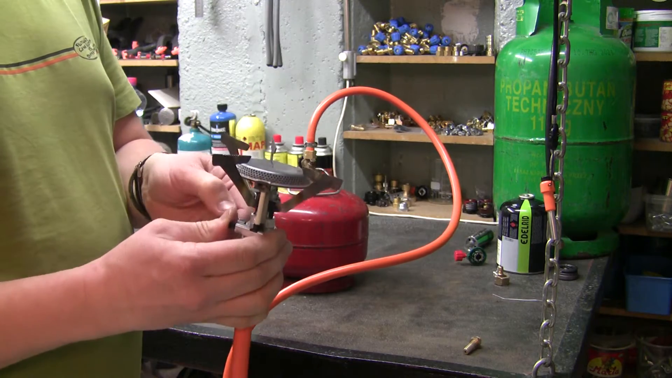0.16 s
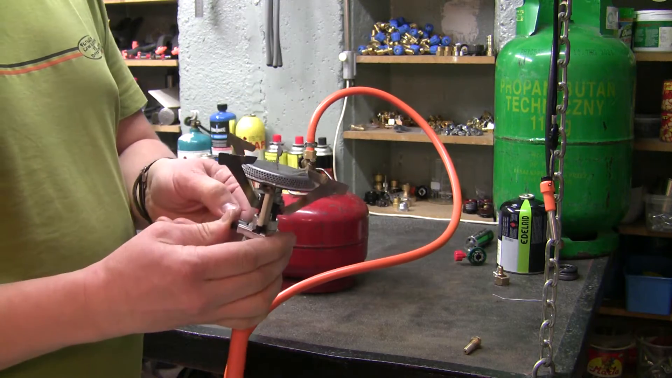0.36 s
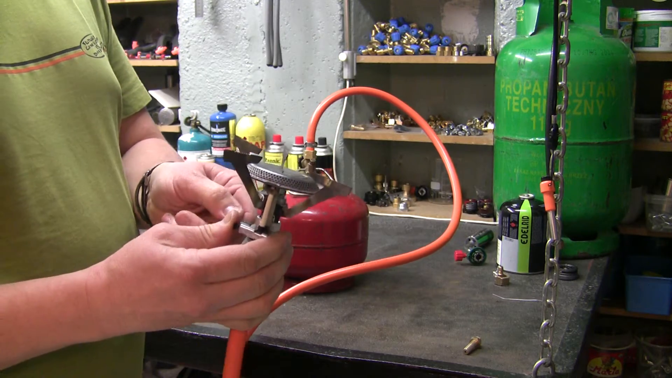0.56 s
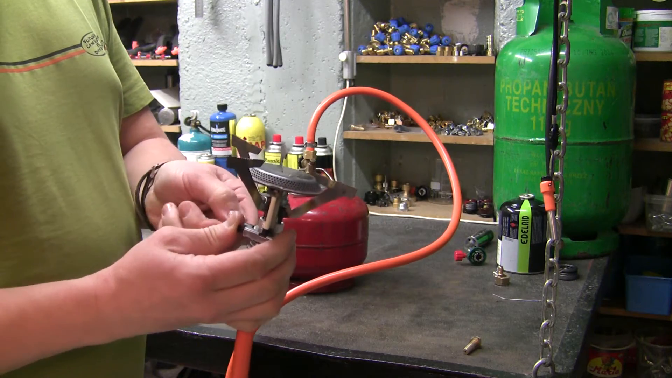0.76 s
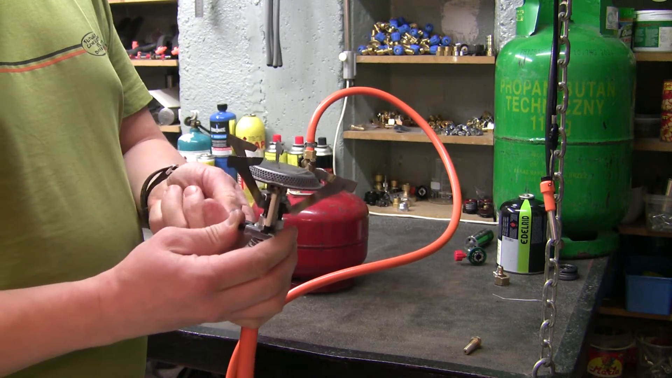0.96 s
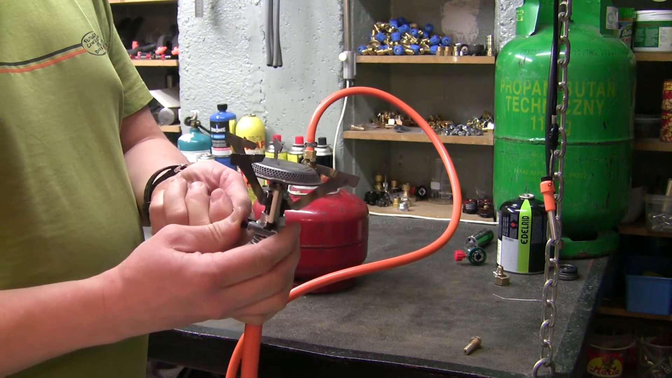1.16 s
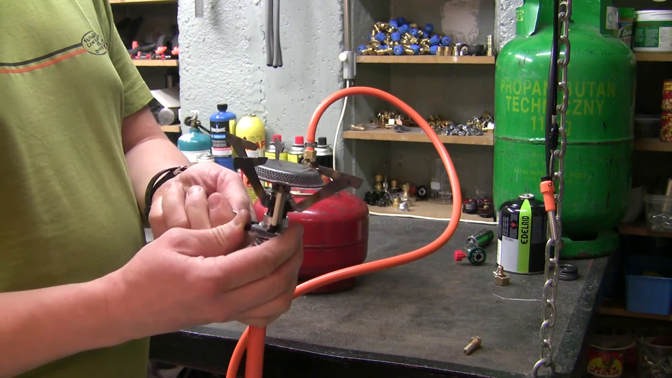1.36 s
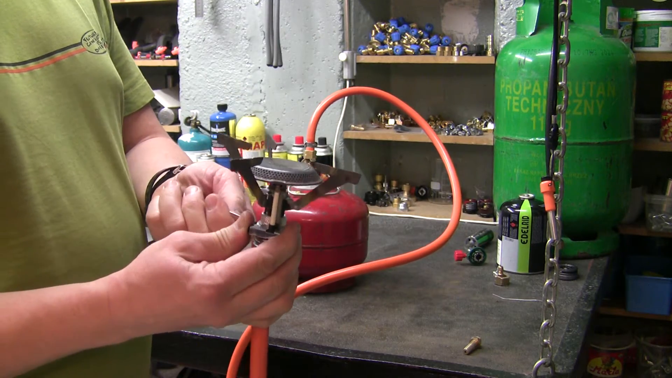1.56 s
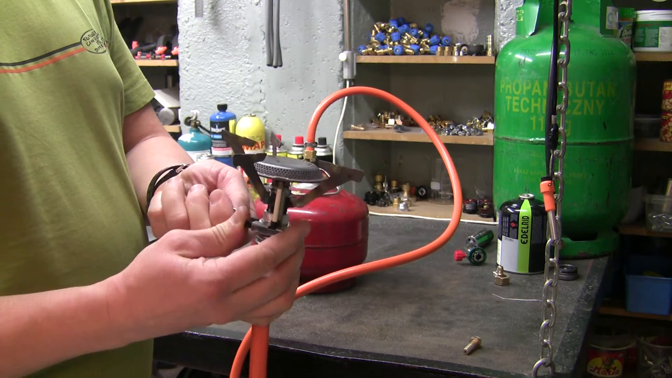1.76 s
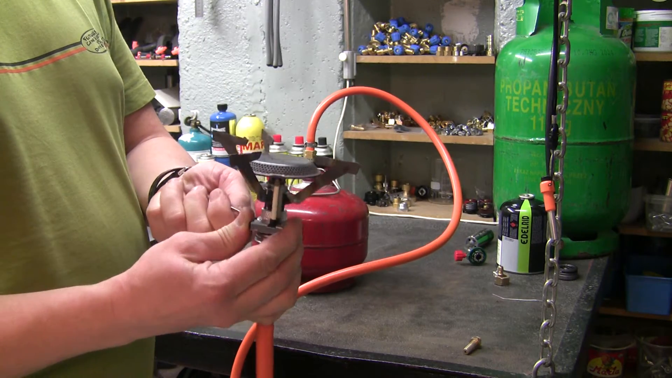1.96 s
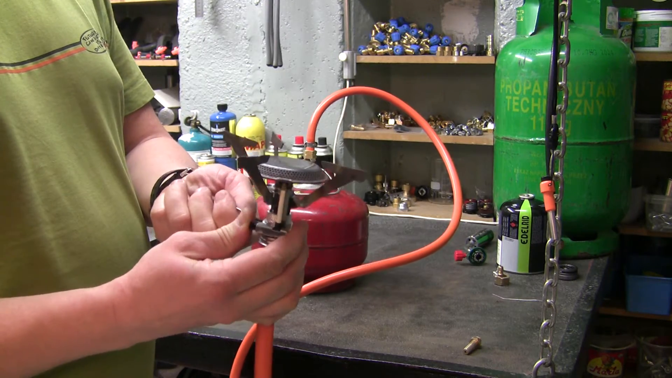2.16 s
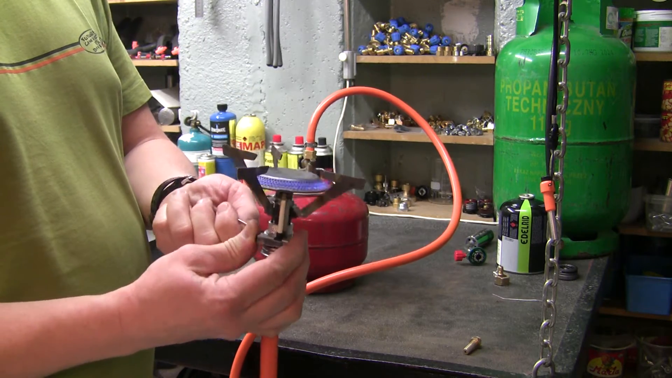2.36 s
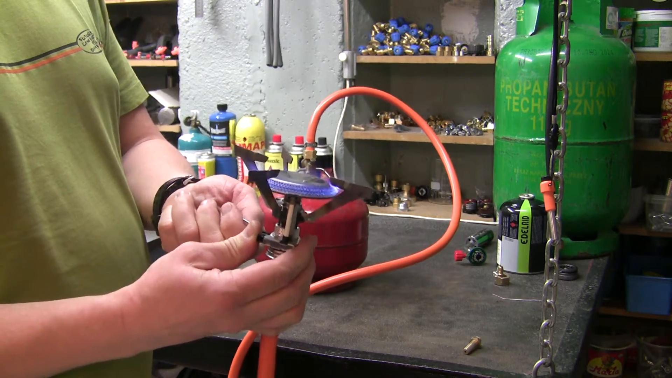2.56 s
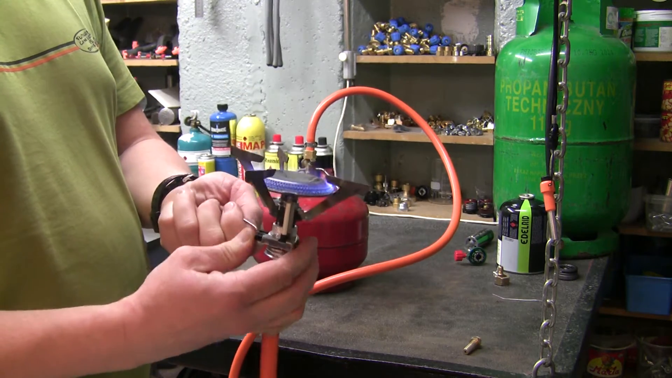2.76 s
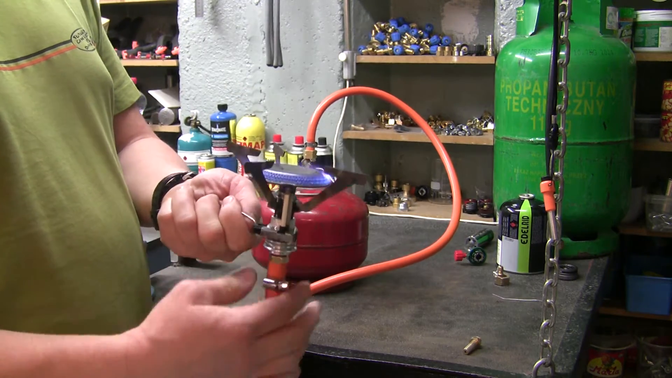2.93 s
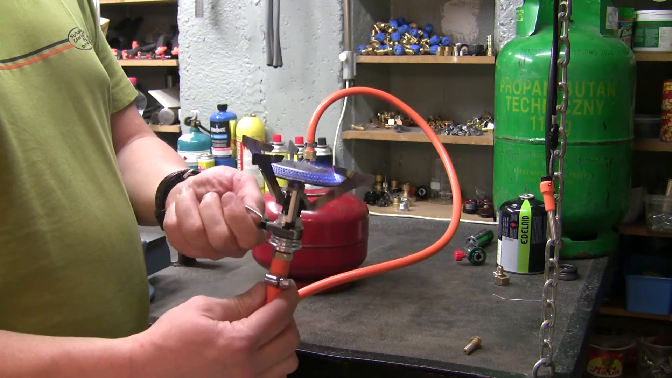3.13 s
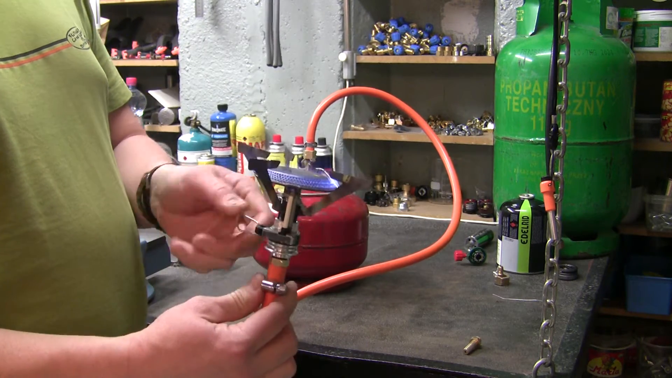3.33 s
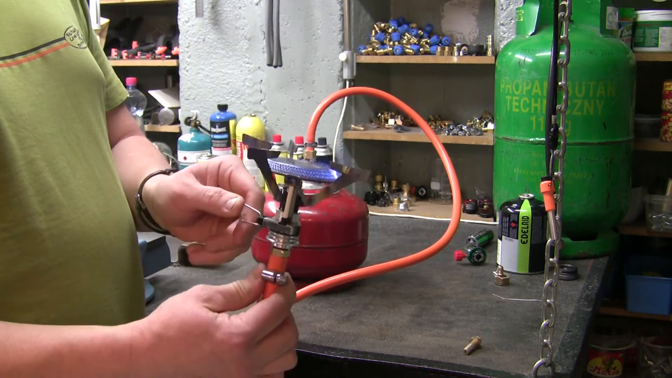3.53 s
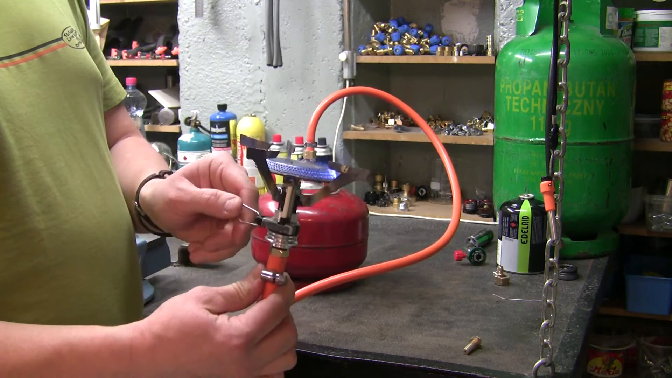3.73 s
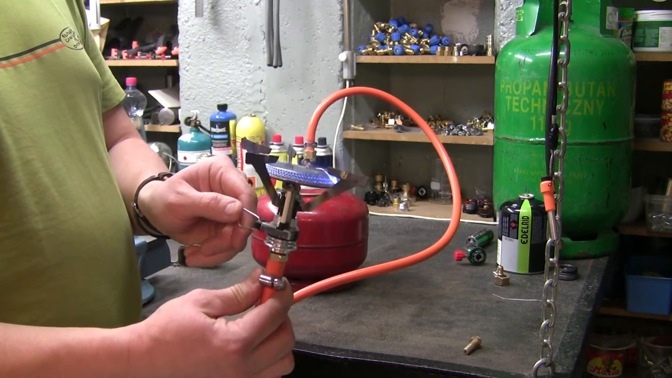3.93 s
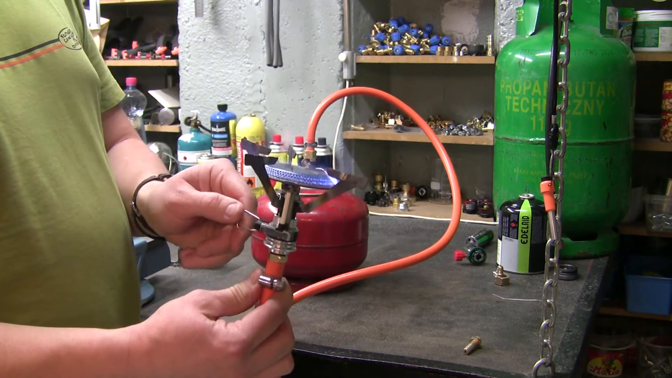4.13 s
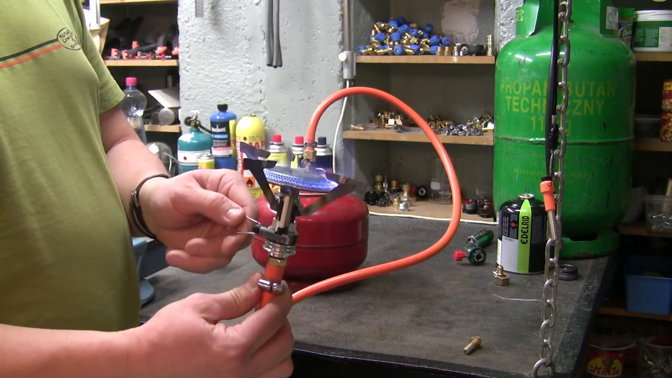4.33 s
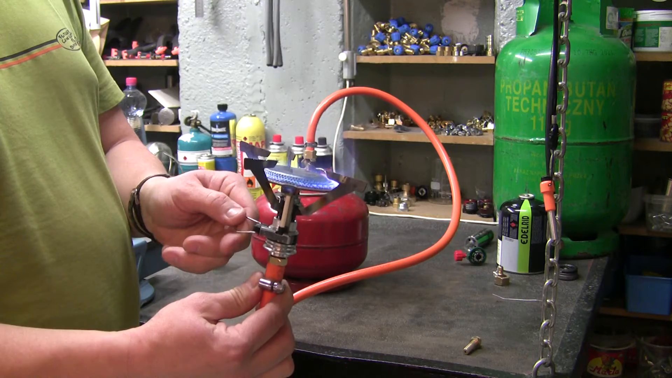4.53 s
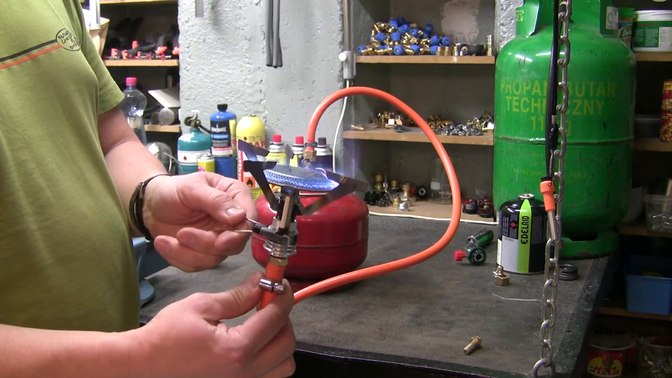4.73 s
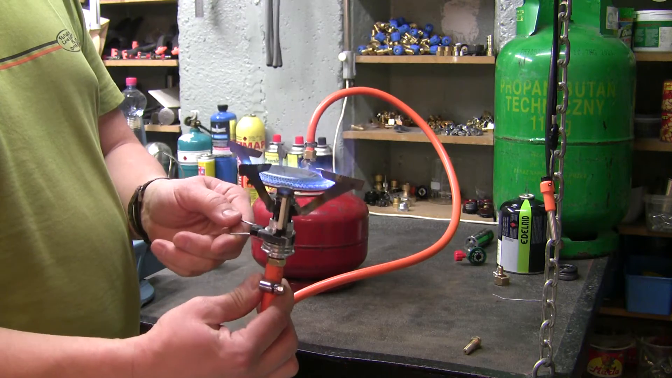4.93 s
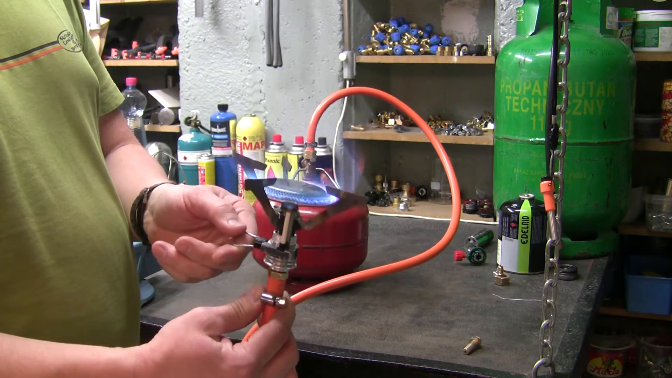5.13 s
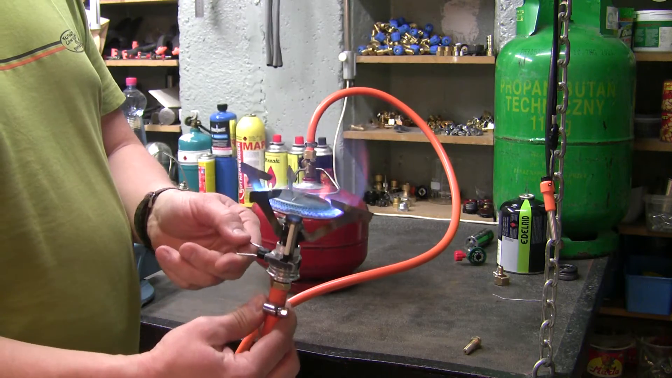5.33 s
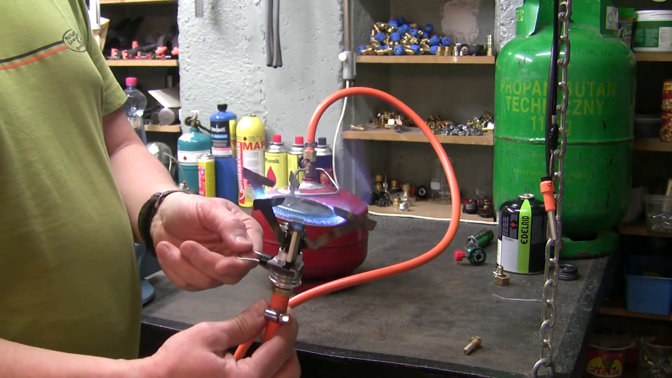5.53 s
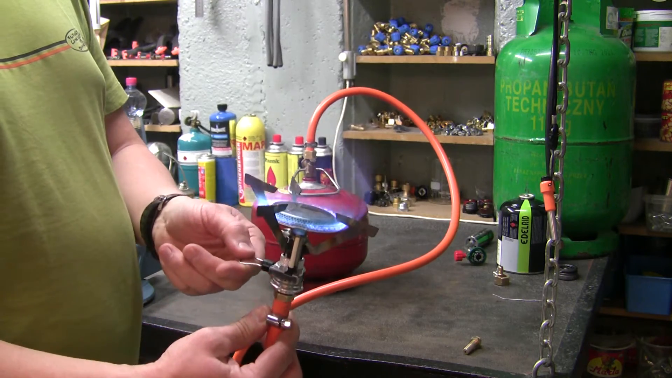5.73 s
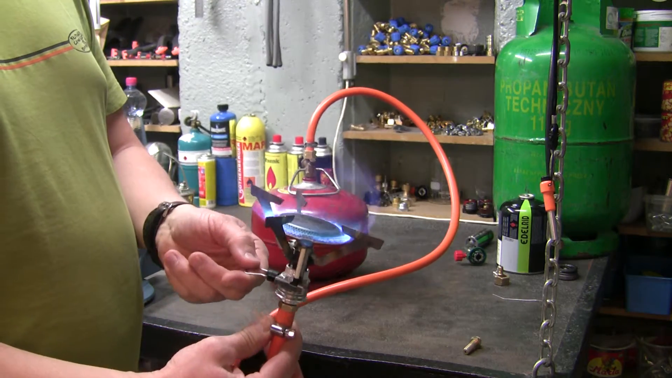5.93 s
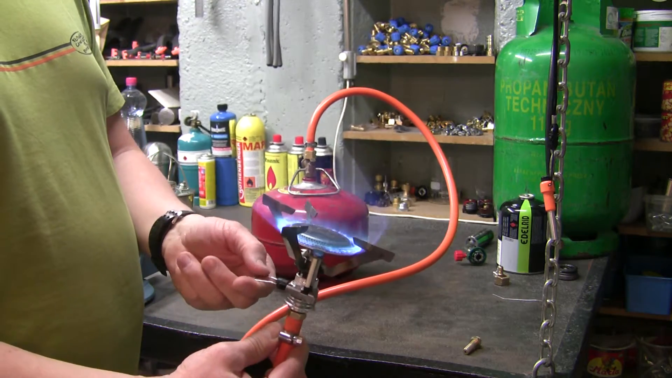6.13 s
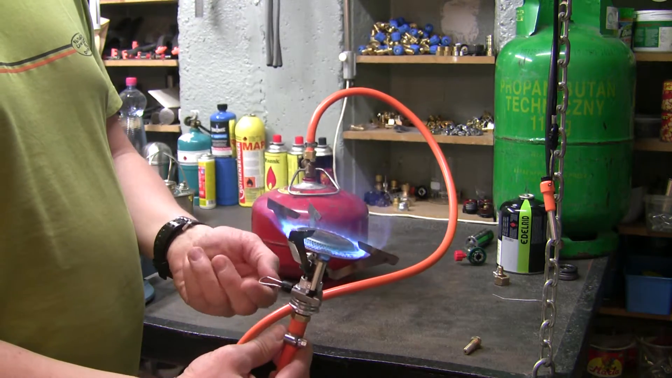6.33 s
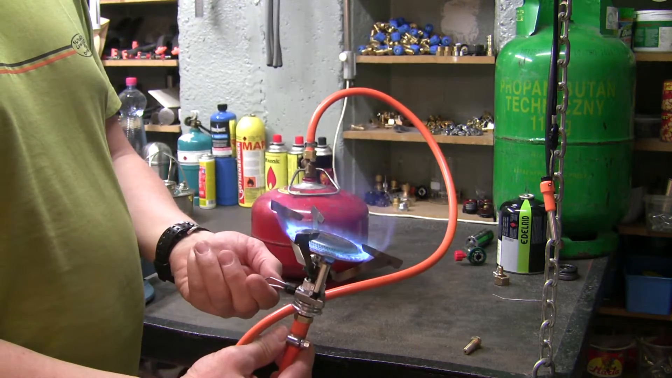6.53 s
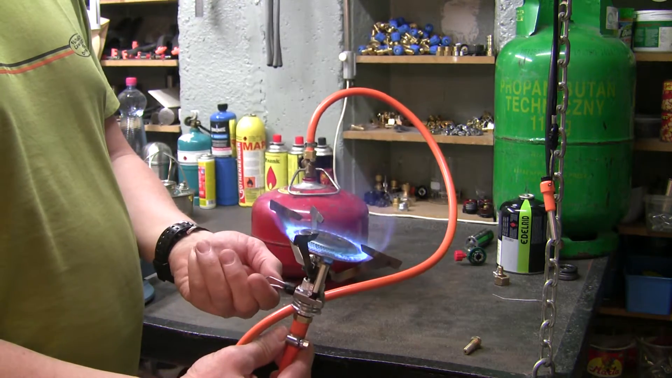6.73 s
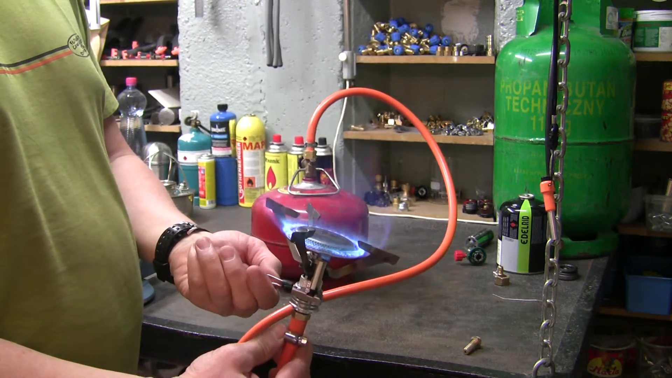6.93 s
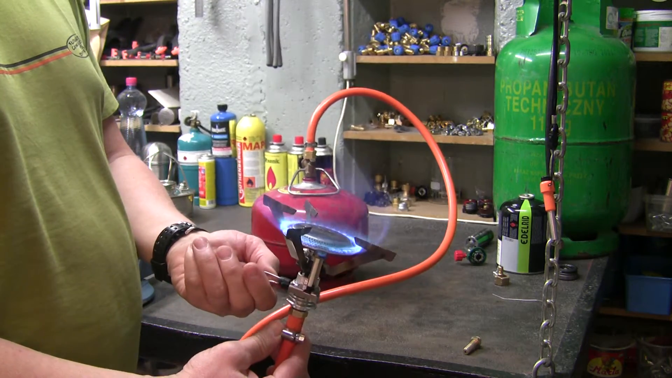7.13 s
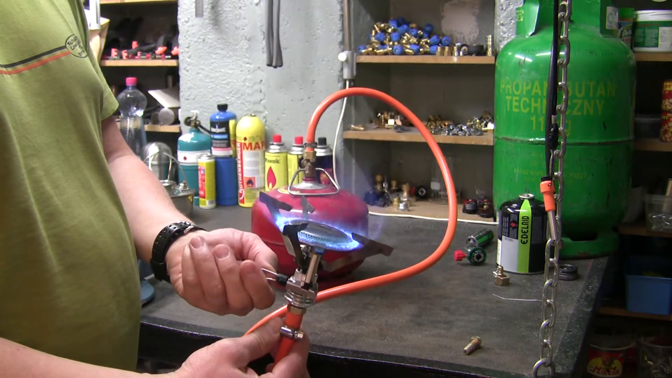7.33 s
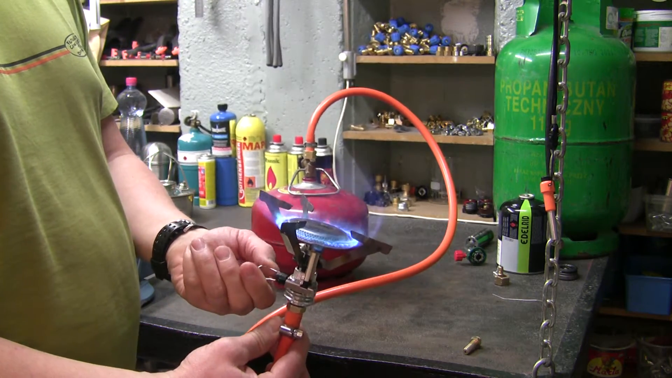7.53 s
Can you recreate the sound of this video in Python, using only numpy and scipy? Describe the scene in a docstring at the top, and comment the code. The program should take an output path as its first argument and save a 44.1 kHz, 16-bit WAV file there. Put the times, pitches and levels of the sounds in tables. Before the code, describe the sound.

Close mono perspective in a small workshop with a short reverberation. At first there is only quiet air and a faint low hum, with small metal ticks of the stove fittings around 0.6-0.7 s. From about 0.95 s a very faint gas hiss begins and strengthens in steps, thin and breathy, with a slight whistle near 3 kHz. Sharp, bright igniter snaps crack at 1.5, 1.9 and 2.3 s, far louder than the hiss, with little handle ticks between and just after them. The third lights the gas: a soft, deep swell rather than a bang, then a low, fluttering rumble. It burns calmly until about 3.85 s, when the hiss rises. From 4.1 s the valve opens wide and jet and flame swell to a roar, full by about 6 s. Brief low flares puff near 4.9, 5.3 and 7 s; the steady, bright, rushing roar continues to the end, around 7.6 s.

```python
"""Lighting a camping stove

A hand-held camping stove is lit in a small workshop, close to a mono microphone.
Gas hisses through the resonant burner tube; the piezo igniter snaps three times and the third spark lights it.
The flame, fluttering bands of noise, rumbles low; the valve opens wide and jet and flame swell to a roar.
Struck metal rings in dying modes, and quiet air and a faint hum lie behind."""
import sys
import numpy as np
from scipy import signal
from scipy.fft import rfft, irfft
from scipy.io import wavfile
from scipy.ndimage import uniform_filter1d, minimum_filter1d

SR = 44100
rng = np.random.default_rng(int(sys.argv[2]) if len(sys.argv) > 2 else 0)


def output_pcm(signal):
    """Save a mono or channel-first signal as 16-bit PCM at the path in sys.argv[1].

    Samples are clipped to [-1, 1] before scaling.
    """
    pcm = np.clip(np.atleast_2d(signal).T, -1, 1) * 32767
    wavfile.write(sys.argv[1], SR, np.round(pcm).astype(np.int16))


N = 334542
TIME = np.arange(N) / SR
LIT_S = 2.30
FULL_FLOW_DB = -24  # reference hiss level for a wide-open valve

# turns of the gas valve: start_s, length_s, level_db (hiss reached, before the tube warms)
VALVE_TURNS = [(0.933, 0.16, -76), (1.0, .16, -58), (1.146, .1, -49), (1.74, 0.99, -41.5),
               (3.84, 0.42, -36.5), (4.104, 2, -22.5)]
HOT_HISS_DB = -2.5  # the warm burner tube softens the hiss


def flow():
    """Throttling: each valve turn moves the jet's strength (dB) to a new level, quickly and then easing off."""
    level = np.full(N, 1e-5)
    for start, length, db in VALVE_TURNS:
        left = 1 - np.clip((TIME - start) / length, 0, 1)
        level = level + (gain_of(db) - level) * (1 - left ** 2)
    return 20 * np.log10(level) + HOT_HISS_DB * warmth()


# broadband spectrum of the gas jet: frequency_hz, density_db (relative, per Hz)
JET_SPECTRUM = [(60, -28), (300, -1.5), (900, -4), (1600, -1), (2500, -0.5), (4000, 0), (5900, -2.5),
                (8500, -2), (10700, -6), (12000, -13.5), (12700, -17.5), (14700, -14.5), (15250, -16),
                (15800, -23)]
# burner tube resonances: cold_hz, hot_hz, width_hz, cold_lift_db, hot_lift_db
TUBE_RESONANCES = [(4330, 4503, 540, 7.5, 6.5), (5100, 4930, 740, 9.5, 4.5), (6840, 6930, 660, 6, 5.5),
                   (7460, 7506, 465, 6.5, 9), (9000, 9680, 490, 4.5, 4), (11490, 11560, 660, 10, 7),
                   (13900, 13650, 810, 13, 11)]
# echoes of the hiss from hand, bench and gas bottles: delay_s, tilt_shift_s, level_db
HISS_ECHOES = [(.0011, .00005, -35), (.0026, -.00014, -16), (.0047, 0.0043, -13), (.0079, -.0002, -5.5),
               (0.0133, .0003, -24), (0.02, .0002, -20)]
# shares by which the tube's resonances shift as the stove moves
TILT_DETUNE, SWAY_DETUNE = 0.007, 0.0049


def jet(flow_db):
    """Turbulent jet noise excites the burner tube, whose resonances shift and change strength as it heats."""
    hz, when, z = signal.stft(noise(JET_SPECTRUM), SR, nperseg=1024, noverlap=768)
    hz, heat = hz[:, None], np.interp(when, TIME, warmth())
    tilt = tilt_at(when)
    sway = np.interp(when, TIME, waver(rate_hz=1.56))  # the hand is never quite still

    for cold, hot, width, cold_db, hot_db in TUBE_RESONANCES:
        centre = (cold + (hot - cold) * heat) * (1 + TILT_DETUNE * tilt + SWAY_DETUNE * sway)
        lift_db = cold_db + (hot_db - cold_db) * heat
        z = z * gain_of(lift_db * bump(hz, centre, width))

    # each echo combs the hiss, and the combs slide as the stove moves
    moved = tilt + .25 * sway
    comb = 1
    for delay, shift, db in HISS_ECHOES:
        comb = comb + gain_of(db) * np.exp(-2j * np.pi * hz * (delay + shift * moved))
    z = z * comb

    hiss = workshop(from_spectrogram(z), wet_db=-10.5)
    hiss /= band_rms(hiss, (5500, 15000))
    mixed = hiss * gain_of(flow_db) + whistle(z, hz, when, heat, flow_db)
    return mixed * (TIME > VALVE_TURNS[0][0]) * gain_of(0.34 * waver(rate_hz=24))


# breathy whistle of the tube: cold_hz, hot_hz, width_hz (before flow broadens it)
TUBE_WHISTLE = (3238, 3305, 185)
WHISTLE_DB, WHISTLE_PER_FLOW = -17, 0.59  # offset, and dB gained per dB of hiss
WHISTLE_HOT_DB, WHISTLE_BLUR = -5.5, 0.81


def whistle(z, hz, when, heat, flow_db):
    """Resonance filtering: a narrow peak selects a breathy tone from the jet noise, and strong flow widens it."""
    cold, hot, width = TUBE_WHISTLE
    relative_flow = np.interp(when, TIME, gain_of(flow_db - FULL_FLOW_DB))
    width = width * (1 + WHISTLE_BLUR * relative_flow ** 2)
    tuned = 1 / (1 + (2 * (hz - cold - (hot - cold) * heat) / width) ** 2)
    tone = evened(from_spectrogram(z * tuned))
    # the whistle grows more slowly than the hiss, and the flame damps it
    level_db = WHISTLE_DB + WHISTLE_PER_FLOW * flow_db + WHISTLE_HOT_DB * warmth()
    return tone * gain_of(level_db)


# the stove is raised, then lowered and tilted toward the microphone:
# time_s, tilt (share: 0 upright, 1 toward it, below 0 away)
STOVE_TILT = [(2.8, -0.19), (4.2, -0.52), (5.0, -0.026), (5.6, 0.16), (6.3, 0.62), (7.57, 0.83)]


def tilt_at(seconds):
    """Source orientation: the stove's tilt, interpolated between its stated positions."""
    return np.interp(seconds, *np.transpose(STOVE_TILT))


WARM_S = .17  # time constant


def warmth():
    """Exponential heating: the burner tube goes from 0 cold to 1 hot."""
    return 1 - np.exp(-since_lit() / WARM_S)


def since_lit():
    """Combustion time: seconds for which the flame has burned."""
    return np.maximum(TIME - LIT_S, 0)


# the flame flares as the stove is swung: centre_s, length_s (at half height), lift_db (of the rumble)
SWING_FLARES = [(4.896, 0.17, 2.0), (5.31, 0.075, 1.5), (6.987, 0.064, 4)]
CATCH_S, SETTLE_S = 0.061, 1  # time constants: catching, and settling as it spreads round the head
FLUTTER_DB, FLUTTER_HZ, DRAUGHT_DB, DRAUGHT_HZ = 0.94, 65, -0.11, 4.9


def flame(flow_db):
    """Combustion noise: unsteady burning modulates a low rumble and a roar, both weak just after lighting."""
    weak = np.exp(-since_lit() / SETTLE_S)
    unrest_db = FLUTTER_DB * waver(FLUTTER_HZ) + DRAUGHT_DB * waver(DRAUGHT_HZ)
    flare_db = sum(db * bump(TIME, s, length) for s, length, db in SWING_FLARES)
    burning = rumble(weak, unrest_db + flare_db)
    burning += roar(flow_db, weak, unrest_db + 0.31 * flare_db)
    return (burning + whump()) * (1 - np.exp(-since_lit() / CATCH_S))


# spectrum of the flame's rumble: frequency_hz, density_db (relative, per Hz)
RUMBLE_SPECTRUM = [(20, -48), (45, -33), (70, -21), (95, -12.5), (120, -0.5), (170, 1), (260, 0.5),
                   (340, -4), (480, -11.5), (700, -19), (1300, -30.5), (3000, -79)]
RUMBLE_DB, RUMBLE_WEAK_DB, RUMBLE_TILT_DB = -23.5, -9, -1.6


def rumble(weak, unrest_db):
    """Low-frequency combustion noise: its level follows the flame's unrest and falls slightly with tilt."""
    sound = noise(RUMBLE_SPECTRUM)
    sound /= band_rms(sound, (90, 350))
    return sound * gain_of(RUMBLE_DB + RUMBLE_WEAK_DB * weak + RUMBLE_TILT_DB * tilt_at(TIME) + unrest_db)


# spectrum of the flame's roar: frequency_hz, density_db (relative, per Hz)
ROAR_SPECTRUM = [(100, -37), (250, 3), (400, 7), (560, 2), (780, -2.5), (950, 2.5), (1200, -2), (1450, -9),
                 (2200, -11.5), (5000, -50)]
ROAR_DB, ROAR_WEAK_DB, ROAR_PER_FLOW = -28, -3, 0.49  # the last is dB per dB of hiss
# below a certain flow the flame is calm and its roar much quieter
TURBULENT_FLOW_DB, TURBULENT_SPREAD_DB, CALM_DB = -39, 2.4, -8.5
# the part of the roar that grows as the flame faces the microphone
FORWARD_SHARE, FORWARD_HZ, FORWARD_WIDTH_HZ = 0.52, 470, 260


def roar(flow_db, weak, unrest_db):
    """Transition to turbulence: the roar strengthens with flow, and more steeply where the calm flame ends."""
    sound = noise(ROAR_SPECTRUM)
    sound /= band_rms(sound, (700, 1300))
    hz = np.fft.rfftfreq(N, 1 / SR)
    low_middle = irfft(rfft(sound) * bump(hz, FORWARD_HZ, FORWARD_WIDTH_HZ), N)
    sound += FORWARD_SHARE * tilt_at(TIME) * low_middle
    calm = 1 / (1 + np.exp((flow_db - TURBULENT_FLOW_DB) / TURBULENT_SPREAD_DB))
    level_db = ROAR_DB + ROAR_WEAK_DB * weak + ROAR_PER_FLOW * (flow_db - FULL_FLOW_DB)
    return sound * gain_of(level_db + CALM_DB * calm + unrest_db)


WHUMP_DB, WHUMP_HZ, WHUMP_LAG_S, WHUMP_S = -41.5, 95, 0.24, .6


def whump():
    """Rapid combustion: gas gathered around the head burns off in a soft, deep swell of narrow-band noise."""
    hz = np.fft.rfftfreq(N, 1 / SR)
    sound = evened(irfft(rfft(rng.standard_normal(N)) * bump(hz, WHUMP_HZ, width=42), N))
    return sound * gain_of(WHUMP_DB) * bump(TIME, LIT_S + WHUMP_LAG_S, WHUMP_S)


# igniter snaps: start_s, level_db (relative), thump_db (in the hand)
IGNITER_SNAPS = [(1.5422, 0, -48), (1.9412, -1, -57), (2.2965, -1, -58)]
# spectrum of the crack: frequency_hz, density_db (relative)
CRACK_SPECTRUM = [(100, -31), (700, -23), (1700, -9.5), (2600, 2), (3300, 0), (5400, 5.5), (6200, 6.5),
                  (7800, 5.5), (9300, 2), (11500, 6.5), (13300, 0.5), (14400, 2), (15300, 6), (16000, -18)]
# modes of igniter and burner head, struck: pitch_hz, level_db (relative), t60_s
HEAD_MODES = [(3120, -23, 0.036), (5300, -28, 0.011), (7900, 5.5, 0.004), (8800, -20, 0.0063),
              (15000, -29, 0.011)]


def igniter():
    """Impact excitation: a sprung hammer hits the crystal; it cracks, the head rings and the hand feels a thump."""
    out, t = np.zeros(N), np.arange(3000) / SR
    thump = np.sin(2 * np.pi * 140 * t) * bump(t, .014, .022)
    chatter = np.exp(-t / 0.0021) + .08 * np.exp(-t / 0.0041)
    for s, db, thump_db in IGNITER_SNAPS:
        crack = signal.fftconvolve(burst(chatter), causal(CRACK_SPECTRUM))
        add(out, s, gain_of(db + 8.5) * crack)
        add(out, s, gain_of(db - 7) * ring(HEAD_MODES, detune=0.011))
        add(out, s, gain_of(thump_db) * thump)
    return out


# ticks of the valve handle and pot supports: start_s, level_db (relative), knock_db (relative)
HANDLE_TICKS = [(.6362, -34, -31), (.719, -55, -46), (1.512, -34, -60), (1.7102, -34, -60),
                (1.776, -27, -42), (2.1472, -27, -50), (2.4969, -24, -50)]
# modes of those fittings: pitch_hz, level_db (relative), t60_s
FITTING_MODES = [(1840, -12, 0.017), (2230, -18, 0.015), (4120, -24, .015), (5580, -9, 0.022),
                 (6600, 1, 0.015), (7070, 0, 0.054), (7100, -20, .025), (8000, -7, 0.018)]
# spectrum of the scrape: frequency_hz, density_db (relative)
SCRAPE_SPECTRUM = [(100, -20), (900, -14), (1500, -9), (2000, -16), (2700, -8), (3600, 1), (4800, -4),
                   (5600, 3), (7100, 1), (7700, -7), (9000, -5), (10000, -19), (15500, -14)]
# spectrum of the knock of the stove's body: frequency_hz, density_db (relative)
KNOCK_SPECTRUM = [(100, -22), (700, -15), (1100, -8), (1500, -4), (2000, 6), (2700, -10), (5000, -26)]


def ticks():
    """Friction and modal ringing: wire handle and folding supports tick with a scrape and knock the stove's body."""
    out, t = np.zeros(N), np.arange(3000) / SR
    scrape = np.exp(-t / .004)
    for s, db, knock_db in HANDLE_TICKS:
        add(out, s, gain_of(db - 6.0) * ring(FITTING_MODES, detune=0.02))
        tick = signal.fftconvolve(burst(scrape), causal(SCRAPE_SPECTRUM))
        add(out, s, gain_of(db + 18.5) * tick)
        knock = signal.fftconvolve(burst(scrape), causal(KNOCK_SPECTRUM))
        add(out, s, gain_of(knock_db + 18) * knock)
    return out


def ring(modes, detune, size=6000):
    """Modal superposition: struck metal as exponentially dying sines, slightly detuned at each blow."""
    t = np.arange(size) / SR
    out = np.zeros(size)
    for hz, db, t60 in modes:
        pitch = hz * (1 + detune * rng.uniform(-1.2, 1))
        out += gain_of(db - 60 * t / t60) * np.sin(2 * np.pi * pitch * t)
    return out


# workshop reverberation: frequency_hz, t60_s
WORKSHOP_DECAY = [(200, 0.22), (1500, 0.1), (4000, 0.3), (8000, 0.13), (15000, 0.15)]


def workshop(x, wet_db):
    """Diffuse reverberation: echoes from bench and shelves merge into a short tail, each band with its own decay."""
    t = np.arange(SR // 2) / SR
    fading = (1 - np.exp(-t / .002)) * np.exp(-t / .03)
    hz, when, z = signal.stft(burst(fading), SR, nperseg=256)
    # the common decay is undone, then each band gets its own
    z = z * np.exp(when / .03) * gain_of(-60 * when / read(WORKSHOP_DECAY, hz)[:, None])
    tail = signal.istft(z, SR, nperseg=256)[1]
    return x + gain_of(wet_db) * signal.fftconvolve(x, tail / np.linalg.norm(tail))[:N]


# spectrum of the workshop air: frequency_hz, density_db (relative, per Hz)
AIR_SPECTRUM = [(20, 4.5), (60, 1.5), (160, 4), (260, -4.5), (550, -5.5), (1000, -12.5), (2500, -13.5),
                (15800, -14.5)]


def room_tone():
    """Stationary background noise: quiet workshop air with a faint low hum of wavering level."""
    hum = np.sin(2 * np.pi * 59.2 * TIME) * gain_of(-66.0 + waver(rate_hz=2))
    return gain_of(-59) * noise(AIR_SPECTRUM) + hum


# standing waves between bench, wall and microphone: pitch_hz, width_hz, lift_db
STANDING_WAVES = [(188, 10, 3), (190, 20, -3), (210.7, 16, 4), (229.5, 21, -5), (267, 30, 4),
                  (304, 26, -7.5), (369.3, 22, 6.5), (386, 27, -7.5), (456.8, 14, 6.5), (527, 23, -2.5),
                  (533, 9.9, 2.5), (641, 18, -11), (665, 22, 7), (703, 48, -2), (803, 23, -7.5),
                  (884, 43, 3), (1022, 34, 4), (1080, 77, -2.5), (1128, 25, 6), (1150, 24, -7.5),
                  (1224, 21, 5)]


def noise(colour):
    """Random-phase synthesis: coloured noise at rms 1, shaped by the standing waves around the bench."""
    hz = np.fft.rfftfreq(N, 1 / SR)
    db = read(colour, hz) + sum(lift * bump(hz, f, width) for f, width, lift in STANDING_WAVES)
    return evened(irfft(np.exp(2j * np.pi * rng.random(len(hz))) * gain_of(db), N))


def burst(envelope):
    """Impulsive excitation: random noise under an envelope, its spectrum evened and its energy set to 1."""
    z = rfft(rng.standard_normal(len(envelope)) * envelope)
    power = uniform_filter1d(abs(z) ** 2, size=len(envelope) // 150)
    even = irfft(z / np.sqrt(abs(power) + 1e-12), len(envelope)) * (envelope > 1e-3)
    return even / np.linalg.norm(even)


def causal(colour, size=2048):
    """Minimum phase: the most compact causal click that has the given spectrum."""
    log_gain = np.log(gain_of(read(colour, abs(np.fft.fftfreq(size, 1 / SR)))))
    return np.fft.ifft(np.exp(np.conj(signal.hilbert(log_gain)))).real[:size // 2]


def waver(rate_hz):
    """Low-pass fluctuation: slow chance of rms 1, its gain halved at the given rate."""
    hz = np.fft.rfftfreq(N, 1 / SR)
    return evened(irfft(rfft(rng.standard_normal(N)) * bump(hz, 0, 2 * rate_hz), N))


def from_spectrogram(z):
    """Overlap-add: the waveform of the jet's short-time spectrum."""
    return signal.istft(z, SR, nperseg=1024, noverlap=768)[1][:N]


def band_rms(x, band):
    """Band level: the rms of x between two frequencies in Hz."""
    hz = np.fft.rfftfreq(len(x), 1 / SR)
    return np.std(irfft(rfft(x) * (hz > band[0]) * (hz < band[1]), len(x)))


def bump(hz, centre_hz, width):
    """Gaussian bell: height 1, half as high at half the width from its centre; also used over time."""
    return 2 ** -(2 * (hz - centre_hz) / width) ** 2


def read(points, hz):
    """Logarithmic frequency scale: a table's value at hz, interpolated."""
    f, value = np.transpose(points)
    return np.interp(np.log(hz + 1), np.log(f + 1), value)


def gain_of(db):
    """Decibel law: a level as an amplitude gain."""
    return 10 ** (np.asarray(db) / 20)


def evened(x):
    """Normalization: the same sound at rms 1."""
    return x / np.sqrt(np.mean(x ** 2) + 1e-20)


def add(mix, s, sound):
    """Linear superposition: adds a sound to the mix at s seconds."""
    part = mix[round(s * SR):][:len(sound)]
    part += sound[:len(part)]


def scene():
    """Superposition of sources: one gas flow drives jet and flame; igniter and ticks sound in the room."""
    flow_db = flow()
    mono = jet(flow_db) + flame(flow_db)
    mono += workshop(igniter(), wet_db=-4.0)
    mono += workshop(ticks(), wet_db=-2.5)
    mono += room_tone()
    return np.array([mono, mono])


EDGE_HZ = 15900


def record(dry):
    """Peak limiting and band limiting: a fast limiter holds peaks at full scale, then a low-pass cuts the top."""
    taps = signal.firwin(511, EDGE_HZ, window=("kaiser", 9), fs=SR)
    allowed = 1 / np.maximum(abs(dry).max(0), 1)
    gain = uniform_filter1d(minimum_filter1d(allowed, size=31), size=31)
    return signal.oaconvolve(dry * gain, taps[None], "same")


dry = scene()
out = record(dry)
output_pcm(out)
```